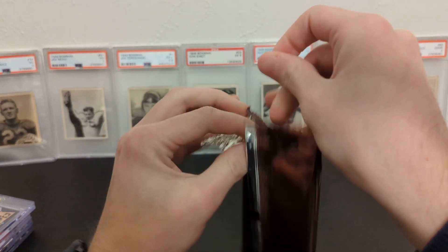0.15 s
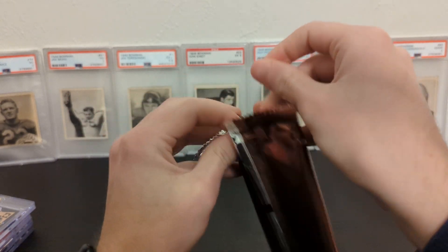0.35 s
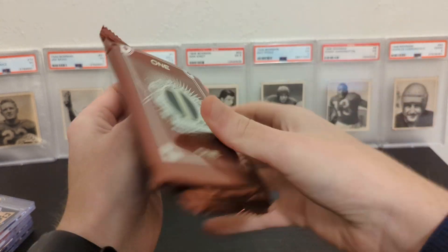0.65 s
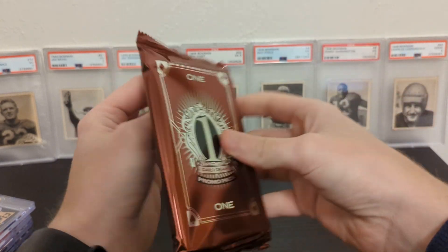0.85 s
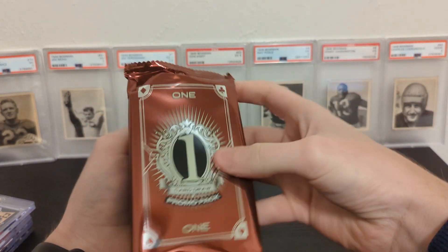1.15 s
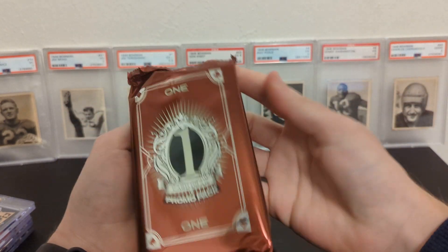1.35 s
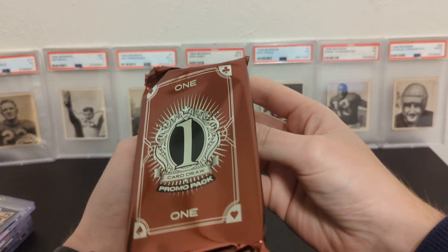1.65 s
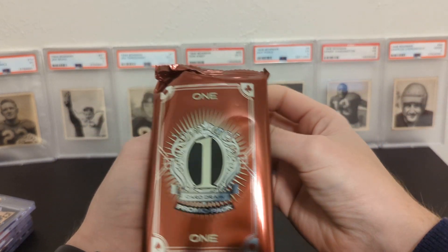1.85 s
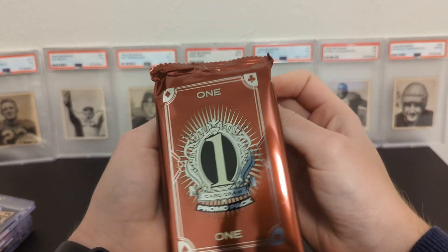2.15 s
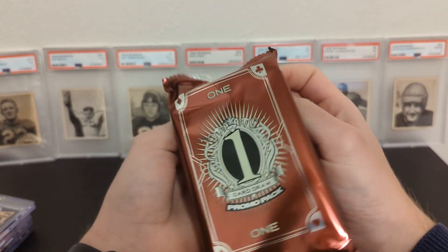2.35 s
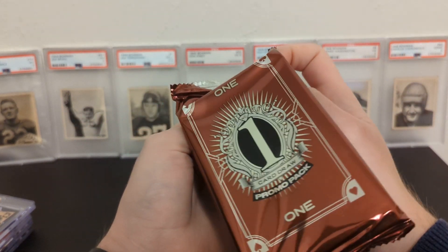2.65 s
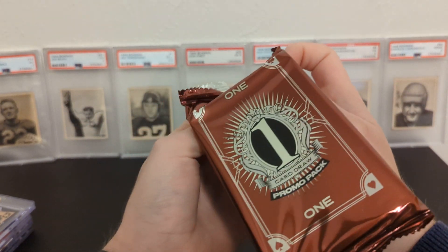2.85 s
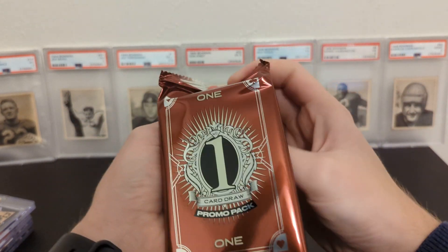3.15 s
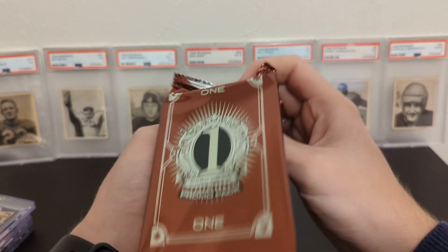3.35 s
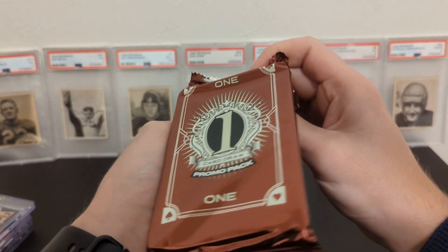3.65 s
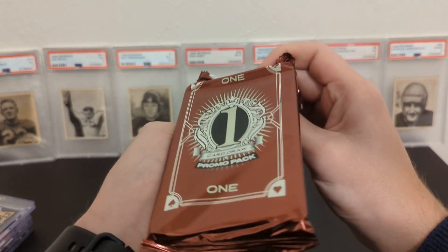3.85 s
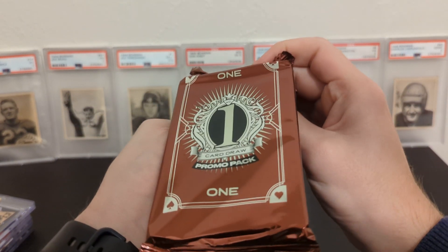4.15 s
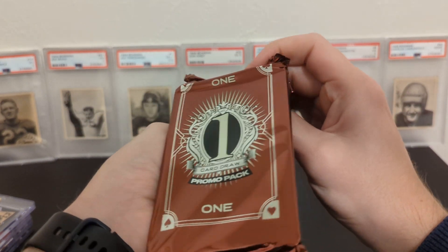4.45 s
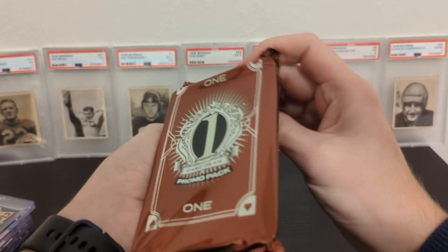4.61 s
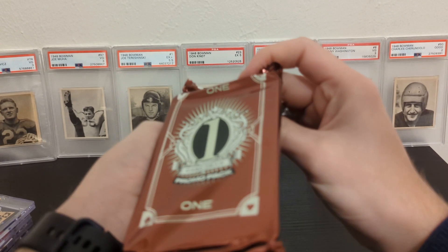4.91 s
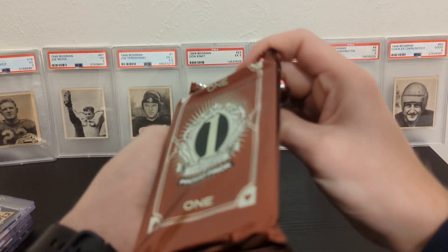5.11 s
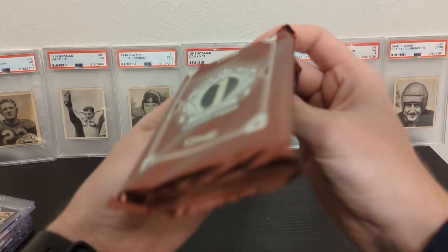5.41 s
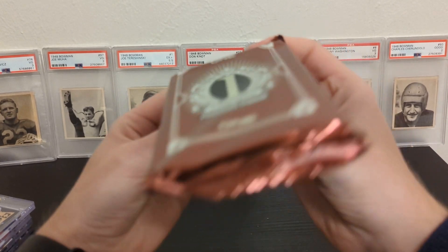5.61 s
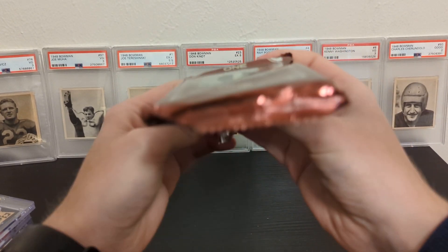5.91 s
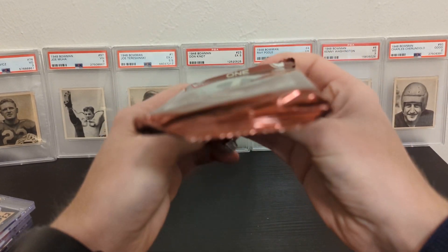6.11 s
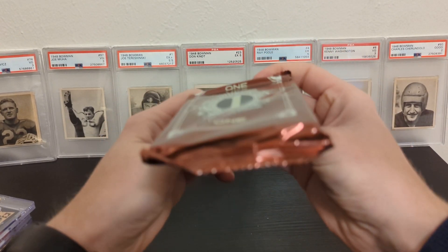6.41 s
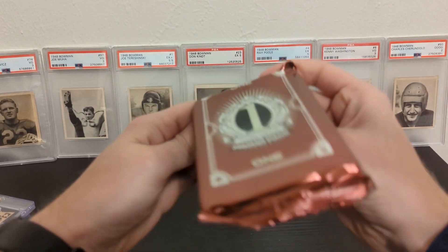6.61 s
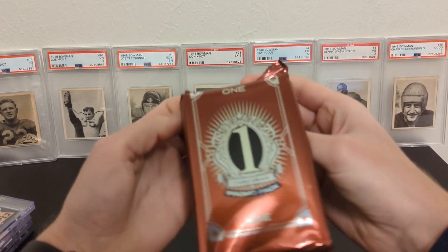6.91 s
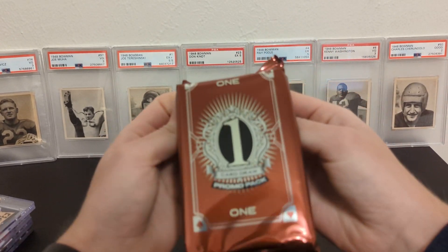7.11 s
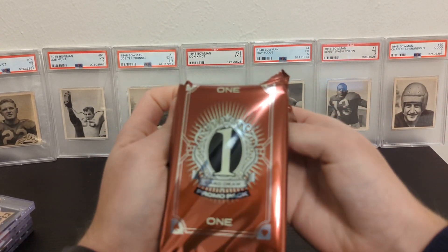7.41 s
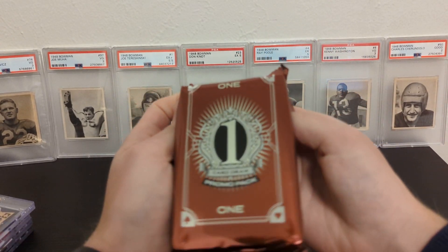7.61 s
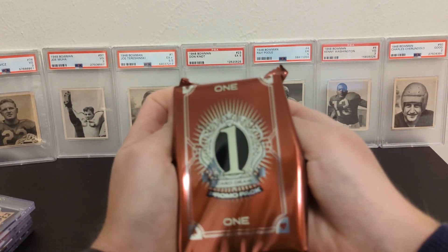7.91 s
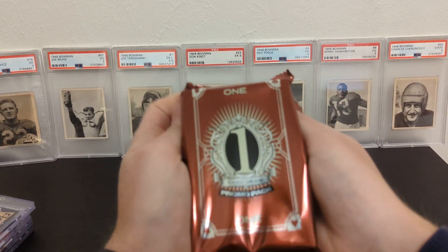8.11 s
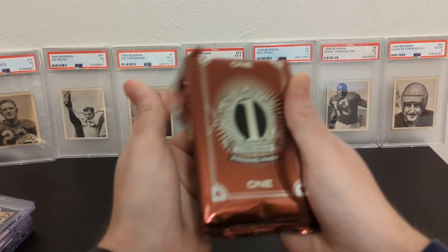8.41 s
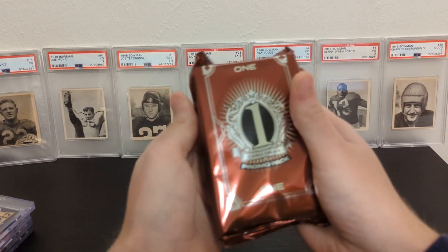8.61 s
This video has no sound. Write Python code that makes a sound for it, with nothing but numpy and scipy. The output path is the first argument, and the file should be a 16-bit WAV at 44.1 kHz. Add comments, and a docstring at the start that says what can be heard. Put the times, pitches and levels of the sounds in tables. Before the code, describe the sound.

Thin metallic-plastic wrapper crinkling, close and dry with a very short room tail. It opens with a few sharp snaps, continues in small rustling squeezes, thickens around three seconds, quiets near four, then builds to a loud crunch and dense crackling towards the end. Occasional muffled thumps come from the packet and table, above faint hum and hiss.

```python
"""Foil pack squeezed in a small room

Two hands squeeze and turn a foil pack close to a pair of microphone ports in a small quiet room.
Creases snap one by one as shaped noise bursts, over fine crackle and dull rustle made of many tiny cracks.
The pack, its contents and the table thump now and then as decaying low modes.
A faint mains-like hum of steady sines lies underneath, with low rumble and hiss of filtered noise."""
import sys
import numpy as np
from scipy import signal
from scipy.fft import rfft, irfft, next_fast_len
from scipy.io import wavfile
from scipy.ndimage import uniform_filter1d

SR = 44100
rng = np.random.default_rng(int(sys.argv[2]) if len(sys.argv) > 2 else 0)


def persist_wave(psi):
    """Save psi, clipped to +-1, as 16-bit WAV."""
    counts = np.round(np.clip(psi, -1, 1) * 32767).astype(np.int16)
    wavfile.write(sys.argv[1], SR, np.atleast_2d(counts).T)


N = 386316

# Creases that buckle close to the ports. Each row: onset in seconds, peak in dB at the louder port
# (before the port balance), ringing band in Hz, low band in dB against the peak,
# treble in dB against the peak, length in ms.
CREASE_SNAPS = [(0.0498, -4.5, 5860, -28, -15.5, 2.3), (0.0812, -25, 8400, -32, -12, 1.9),
                (0.112, -9.5, 5900, -38, -8, 2.2), (0.1319, -9.5, 13900, -17, -12, 3.3),
                (0.412, -19, 5960, -60, -31, 2.1), (0.4692, -19.5, 13100, -8, -4, 3.4),
                (0.4798, -15, 7040, -33, -26, 1.6), (0.5666, -19, 14000, -26, -18, 2.3),
                (0.673, -17, 9000, -27, 7, 3), (0.7185, -22, 1560, -10, -13, 2.7),
                (0.7702, -10, 5040, -21, -13, 7.3), (0.887, -13.5, 2320, -16, -26, 5),
                (1.0291, -21.5, 10300, -25, 2, 2.7), (1.1902, -10.5, 5800, -21, -8.5, 7.6),
                (1.1967, -13.5, 11700, -30, -5.5, 4.7), (1.2925, -15.5, 8920, -36, -4, 4.9),
                (1.3545, -14, 8600, -27, -13, 5.3), (1.503, -16, 8600, -40, -19, 2.7),
                (1.5239, -23, 2080, -25, -14, 3.4), (1.6447, -21.5, 8600, -26, -18, 3),
                (1.7416, -17.5, 12200, -29, -3, 2.7), (1.8937, -15.5, 6380, -32, -12, 4.3),
                (2.03, -15, 6100, -22, -10, 3.6), (2.048, -14, 8650, -37, -18, 5.1),
                (2.357, -23, 2020, 0, -15, 3), (2.4551, -10.5, 7840, -15, -10, 3.9),
                (2.5003, -6, 13800, -28, -8, 3), (2.5262, -20, 6280, -31, -17, 3),
                (2.6023, -15.5, 10100, -34, -20, 2.6), (2.638, -9.5, 6500, -46, -12, 4.1),
                (2.8175, -19, 3750, -26, -15, 1.9), (2.8848, -14.5, 8550, -13, -9, 3.3),
                (2.9472, -11, 1540, -18, -2, 4), (3.05, -11, 7600, -18, -11, 4.4),
                (3.136, -11, 9960, -24, -21, 2.6), (3.154, -4.5, 6220, -46, -21, 2.3),
                (3.207, -20, 7740, -32, -13, 3), (3.245, -10.5, 5900, -24, -18, 2.6),
                (3.3389, -7, 7640, -12, -2, 4.1), (3.3484, -9.5, 1760, -22.5, -7, 1.5),
                (3.3823, -4.5, 6230, -15.5, -10, 3.4), (3.4331, -13.5, 3220, -34, -20, 3),
                (3.4595, -10, 12800, -49, -19, 3), (3.5229, -8.5, 10800, -39, -12, 3.5),
                (3.5424, -8, 3100, -19, -15, 1.5), (3.5534, -5, 3940, -19.5, -14, 3),
                (3.6428, -10.5, 6140, -26, -19, 3), (3.745, -10.5, 7160, -15.5, -2, 3),
                (3.8656, -15, 6050, -35, -23, 3.4), (3.8814, -24, 2060, -25, -21, 3.4),
                (3.9586, -9.5, 5650, -31, -30, 1.9), (4.0103, -14, 4300, -33, -22, 2.5),
                (4.128, -18.5, 10700, -23, -7.5, 2.7), (4.1574, -36, 1970, -22, -13, 3),
                (4.1769, -20, 6100, -57, -16, 3), (4.2198, -21.5, 10500, -26, -13, 2.6),
                (4.2438, -18, 1950, -33, -42, 2.2), (4.3152, -12.5, 8300, -30, -10, 2.6),
                (4.4528, -19, 7810, -42, -7, 1.9), (4.4886, -5.5, 6180, -27.5, -15.5, 4.4),
                (4.6099, -14, 1920, -23, -27, 3.3), (4.6633, -7, 2130, -20, -17, 2.4),
                (4.6724, -1, 2980, -35.5, -19, 2.6), (4.7955, -11.5, 7900, -27, -13, 1.9),
                (4.8593, -6, 6350, -29.5, -19.5, 2.1), (4.8936, -6.5, 13800, -29, -13.5, 3.3),
                (4.9468, -16.5, 2920, -31, -25, 3.4), (5.0604, -14, 13200, -56, -8, 2.4),
                (5.0734, -23, 1600, -21, -19, 2.1), (5.1334, -15, 8650, -21.5, -5.5, 3),
                (5.178, -24, 14000, -25, -17, 3), (5.25, -17.5, 2020, -27, -10, 5),
                (5.2613, -15, 7360, -28, -35, 3.9), (5.3677, -16.5, 8600, -35, -23, 1.1),
                (5.4325, -22.5, 3090, -24, -33, 1.9), (5.4596, -22, 2060, -19, -14, 3.6),
                (5.4784, -8, 13000, -26.5, -15, 4), (5.5637, -16, 2980, -28, -19.5, 5.3),
                (5.6208, -6, 12000, -29, -8, 3.7), (5.655, -10, 8100, -14.5, -3.5, 2.5),
                (5.681, -1.5, 6400, -22, -4, 5.1), (5.6928, -11.5, 6020, -22, -16, 2.1),
                (5.7763, -20.5, 9720, -4, -9, 3.7), (5.791, -19, 1870, -16, -10, 2.1),
                (5.8403, -14.5, 6400, -20.5, -21, 2.5), (5.8544, -18.5, 2090, -26, -27, 2.6),
                (5.9392, -24.5, 2140, -9, -6, 1.9), (6.0255, -18.5, 11900, -33, 3, 3),
                (6.0415, -15, 12000, -19, 0, 2.1), (6.0935, -15, 6270, -36, -14, 3),
                (6.1085, -22.5, 12000, -22, -21, 3), (6.1284, -17, 3070, -26, -34, 4),
                (6.1386, -14.5, 10800, -28, -16, 3.3), (6.2589, -6, 9600, -31, -13, 5.2),
                (6.3244, -15, 8970, -27, -7, 3), (6.336, -10.5, 6540, -25, -33, 3.4),
                (6.3622, -12, 8800, -36, -22, 3.2), (6.4196, -13, 8700, -45, -15, 3),
                (6.4388, -13.5, 7850, -49, -11, 4.2), (6.5845, 4, 6230, -24, -4, 3.2),
                (6.6224, -2, 1980, -22, -17, 2.4), (6.6314, -10, 2170, -25, -13, 3),
                (6.648, -5, 2800, -24, -38, 2), (6.7204, -13.5, 2210, -43, -40, 3),
                (6.769, -8.5, 7800, -33, -12, 2.5), (6.8088, -8, 3040, -25, 3, 2.5),
                (6.8945, -9.5, 2170, -17.5, 0.5, 3.8), (6.944, -16.5, 2890, -28, -25, 4.4),
                (6.9848, -18, 6220, -32, -15, 3), (7.0641, -11.5, 2850, -26, -24, 4.8),
                (7.0833, -14, 2610, -16.5, -16.5, 8.6), (7.1198, -10.5, 6340, -48, -23, 2.3),
                (7.2, -14, 12400, -21, -14, 2.4), (7.232, -10.5, 6300, -20, -16, 2.8),
                (7.275, -15, 3150, -30, -23, 3.6), (7.292, -1.5, 8830, -24.5, -16, 3.5),
                (7.3586, -0.5, 6570, -47, -28, 4.5), (7.3684, -1, 6540, -37, -28, 2.7),
                (7.382, -7, 2480, -26, -27, 7.4), (7.3971, 0.5, 2120, -31, -23, 3),
                (7.5915, -6, 8050, -21, 5, 4.9), (7.6899, -24, 12500, -31, -5, 3),
                (7.7117, -10.5, 12700, -25, -7, 3), (7.7333, -5.5, 12500, -14, -3, 3),
                (7.7745, -2, 10200, -19, -7.5, 4.2), (7.8002, -12, 12800, -34, -9, 3),
                (7.8044, -5.5, 12800, -13.5, -7, 3.7), (7.861, -2, 6950, -20, -2, 3.7),
                (7.894, 1, 13900, -19, -7, 3.6), (7.9773, -3, 10100, -36, 1, 2.6),
                (8.064, -8.5, 2090, -31, -17, 1.9), (8.0931, -8.5, 9220, -16, -10, 2.2),
                (8.2004, -2.5, 10100, -17, -9, 2.2), (8.272, -10.5, 10400, -12, -14, 4.8),
                (8.3694, -9.5, 2020, -7.5, -1, 1.6), (8.3984, -8, 2050, -19, -16, 4.1),
                (8.4532, -15, 2060, -21, -20, 2.6), (8.498, -12, 14100, -33, -18, 2.3),
                (8.5757, -10.5, 2140, -19, -16, 2.4), (8.609, -9.5, 7070, -28, 4, 3),
                (8.7445, -5, 6280, -27, -12, 3)]
USUAL_LOW_DB, USUAL_TREBLE_DB = -21.5, -17  # usual low-band and treble shares of a snap in dB against its peak; each snap's tilt is reckoned from these
BURST_PEAK_S = 0.01  # a burst peaks this long after its start


def gain_of(db):
    """Turns decibels into an amplitude factor."""
    return 10 ** (np.asarray(db) / 20)


def evened(x):
    """Scales a signal to rms 1."""
    return x / np.sqrt(np.mean(x ** 2) + 1e-20)


def read(points, hz):
    """Reads a curve of (Hz, value) points on a log-frequency axis."""
    f, value = np.transpose(points)
    return np.interp(np.log(hz + 1), np.log(f + 1), value)


def add(mix, s, sound):
    """Mixes a two-channel sound in at time s in seconds."""
    part = mix[:, max(round(s * SR), 0):][:, :sound.shape[1]]
    part += sound[:, :part.shape[1]]


def ports(pair, colour_db):
    """Colours two unrelated signals and blends them into two ports whose likeness depends on pitch."""
    # How alike the two microphone ports hear. Each row: frequency in Hz, left-right likeness from 0 to 1.
    port_likeness = [(60, 0.84), (130, 0.89), (290, 0.87), (640, 0.62), (1410, 0.44), (3100, 0.32),
                     (15000, 0.96)]
    left_lead, lead_spread = 2.73, 2.06  # samples: mean lead of the left port, and its random spread
    hz = np.fft.rfftfreq(pair.shape[-1], 1 / SR)
    same = np.clip(read(port_likeness, hz), 0, 1)
    a, b = rfft(pair)
    lead_s = (left_lead + lead_spread * rng.standard_normal()) / SR
    left = a * np.exp(2j * np.pi * hz * lead_s)
    right = same * a + np.sqrt(1 - same ** 2) * b
    return irfft(np.array([left, right]) * gain_of(colour_db(hz)), pair.shape[-1])


def slow(per_s):
    """Smooth chance: unit-variance random knots, per_s of them a second, joined by straight lines."""
    knots = rng.standard_normal(4000)
    return np.interp(np.arange(N) / SR * per_s, np.arange(len(knots)), knots)


def burst(rise_s, crack_s, ring_s, ring_db):
    """Two noise bursts: a quick rise to a sharp tick, a short crack, and a ring of the sheet after it."""
    t = np.arange(2048) / SR - BURST_PEAK_S
    rise = 1.13 * np.exp(-abs(t) / rise_s)
    fall = np.exp(-abs(t) / crack_s) + gain_of(ring_db) * np.exp(-abs(t) / ring_s)
    tick = 0.41 * np.exp(-abs(t) / 0.00026)
    shape = np.where(t < 0, rise, fall) + tick
    return rng.standard_normal((2, len(t))) * shape * signal.windows.tukey(len(t), 0.1)


def hum():
    """Steady hum sines, two close enough to beat, over filtered noise: low rumble and faint room hiss."""
    # The hum lines. Each row: frequency in Hz, level in dB rms before the port balance.
    hum_lines = [(59.06, -69), (119.96, -58.6), (123.4, -67.5)]
    # Spectrum of the quiet room. Each row: frequency in Hz, relative density in dB per Hz.
    rumble_shape = [(12, -46), (20, 28), (120, 44.5), (204, 32), (574, -14), (1030, -49), (1330, -56),
                    (2020, -48), (2750, -25), (6180, -6), (6910, -76), (12100, 20), (16000, 20)]
    rumble_db = -60.5  # rms before the port balance
    t = np.arange(N) / SR
    lines = 0
    for hz, db in hum_lines:
        lines = lines + np.sqrt(2) * gain_of(db) * np.sin(2 * np.pi * (hz * t + rng.random()))
    noise = rng.standard_normal((2, next_fast_len(N)))
    rumble = ports(noise, lambda hz: read(rumble_shape, hz))[:, :N]
    port_balance = gain_of([[0.4], [-0.4]])
    return (lines + gain_of(rumble_db) * evened(rumble)) * port_balance


def foil_db(hz):
    """The colour in dB that snaps and fine crackle share: a broad curve with the foil's resonances on top."""
    # Foil heard at the microphone. Each row: frequency in Hz, relative density in dB per Hz.
    foil_colour = [(240, -30), (400, -14), (700, -12), (1370, -5), (3000, -3), (5000, -3), (8000, 0),
                   (15300, 0), (16500, -4)]
    # Resonances on top of it. Each row: centre in Hz, width in Hz, height in dB.
    foil_resonances = [(2117, 195, 4.3), (4160, 81, 1.84), (6300, 740, 3.86), (8940, 82, 6),
                       (10100, 98, 1.5), (12400, 225, 2.7)]
    peaks = sum(db * np.exp(-((hz - peak_hz) / width) ** 2) for peak_hz, width, db in foil_resonances)
    return read(foil_colour, hz) + peaks


def working():
    """Gains of fine crackle and dull rustle, and the tilt: holding, squeezes and snap showers add in power."""
    # The pack merely held. Each row: time in seconds, crackle in dB, dull rustle in dB against the crackle.
    holding = [(0, -55, -4), (1.6, -53, -2), (2.8, -44, -19), (3.9, -44, -17.5), (4.44, -55, -20.5),
               (5.05, -51, -14), (6, -47.5, -22), (7.04, -62, -1), (7.6, -40.5, -10), (8.76, -42.5, 1)]
    # Squeezes of the pack. Each row: start in seconds, length in seconds, crackle in dB at the start,
    # crackle in dB at the end, dull rustle in dB against the crackle, tilt in dB per octave.
    squeezes = [(0, 0.22, -37, -41, -8.5, 3), (0.213, 0.038, -33.5, -25.5, -12, -9.5),
                (0.258, .14, -38, -44.5, -4.5, -8), (0.472, 0.044, -37, -39, -14, 0.5),
                (0.673, 0.056, -42, -39.5, -14, -2), (0.756, 0.081, -42.5, -38, -2.5, -2),
                (0.872, 0.22, -34.5, -49, -14, 0.5), (1.14, 0.12, -43, -41, -3, -0.5),
                (1.266, 0.14, -39.5, -41, -9, -0.5), (1.436, 0.12, -41, -39.5, -9.5, 0),
                (1.726, 0.087, -40.5, -44, -12.5, 1.5), (1.873, 0.29, -38.5, -35.5, -12, 1.5),
                (2.321, 0.21, -38.5, -34, -9, 2.5), (2.602, 0.21, -35.5, -30.5, -23, -3.5),
                (2.922, 0.16, -41.5, -35.5, -9.5, -1), (3.147, 0.1, -36, -37.5, -12.5, -4),
                (3.332, 0.14, -31.5, -40.5, -10, -1), (3.531, .26, -38.5, -42, -34, 6.5),
                (3.854, 0.052, -48.5, -49, -7.5, 23), (4.205, 0.084, -46.5, -50, -16, 10),
                (4.302, 0.1, -44.5, -44, -29, 6.5), (4.482, 0.1, -45.5, -36, -23, -3),
                (4.652, 0.2, -43.5, -41.5, -15.5, -6), (5.14, 0.075, -43.5, -47, -28, 0),
                (5.264, 0.065, -44, -52, -9, -4), (5.452, 0.3, -44, -38.5, -23, -1.5),
                (5.766, 0.18, -43, -41, -21, 5.5), (6.082, 0.033, -41, -34, -28, 6),
                (6.13, 0.15, -31, -32, -46, 10.5), (6.317, 0.25, -30, -46, -41, 6.5),
                (6.559, 0.037, -37, -26, -27, 8.5), (6.593, 0.099, -14.5, -33.5, -23.5, -4.5),
                (6.662, 0.32, -37, -40, -14.5, -4), (7.065, 0.34, -45, -33.5, -14.5, -3.5),
                (7.288, 0.055, -21, -13.5, -30, -0.5), (7.341, .12, -25, -22, -20.5, -3.5),
                (7.571, 0.051, -32.5, -28.5, -17, -3), (7.737, .12, -24.5, -32, -15, 3.5),
                (7.856, 0.11, -18.5, -21, -22, -2), (7.981, 0.13, -28, -30.5, -31, -3.5),
                (8.176, 0.32, -33, -36.5, -10, -3), (8.599, 0.068, -37, -30.5, -8, -3),
                (8.692, .08, -23.5, -30, -7.5, -3)]
    grip_db_per_s, ease_db_per_s = 900, 448  # how fast a squeeze sets in and lets go
    shower_db, shower_db_per_s = -26, 361  # crackle set off by a snap, against its peak; its decay
    shower_dull_db = -13.0  # dull rustle against that crackle, at the usual low share
    t = np.arange(0, N / SR + 0.01, 0.002)
    s, held_db, held_dull_db = np.transpose(holding)
    fine = gain_of(np.interp(t, s, held_db)) ** 2
    dull = fine * gain_of(np.interp(t, s, held_dull_db)) ** 2
    tilt = 0 * t
    for start, length, first_db, last_db, dull_db, tilt_db in squeezes:
        end = start + length
        off_db = grip_db_per_s * np.maximum(start - t, 0) + ease_db_per_s * np.maximum(t - end, 0)
        power = gain_of(np.interp(t, [start, end], [first_db, last_db]) - off_db) ** 2
        fine = fine + power
        dull = dull + power * gain_of(dull_db) ** 2
        tilt = tilt + power * tilt_db
    tilt = tilt / fine  # mean tilt, weighted by power
    for onset, peak_db, _, low_db, *_ in CREASE_SNAPS:
        power = (t >= onset) * gain_of(peak_db + shower_db - shower_db_per_s * abs(t - onset)) ** 2
        fine = fine + power
        dull = dull + power * gain_of(low_db - USUAL_LOW_DB + shower_dull_db) ** 2
    return [np.interp(np.arange(N) / SR, t, v) for v in (np.sqrt(fine), np.sqrt(dull), tilt)]


def grains(colour_db, lo_hz, hi_hz, per_s, spread_db, clump_db, length_s, count, tilt_db=0):
    """Clumped tiny cracks of many sizes, each kind favouring one band; the running rms is held at 1."""
    out, kind = np.zeros((2, N)), rng.integers(0, count, N)
    octaves_up = np.log2(hi_hz / lo_hz) * kind / (count - 1)
    size = gain_of(spread_db * np.minimum(rng.exponential(1, N), 4) + clump_db)
    size *= (rng.random(N) < per_s / SR) * gain_of(tilt_db * octaves_up)
    for k, ring_hz in enumerate(np.geomspace(lo_hz, hi_hz, count)):
        def tint(hz):
            return colour_db(hz) + 14.4 * np.exp(-(np.log((hz + 1) / ring_hz) / 0.8) ** 2)
        noise = burst(rise_s=0.69 * length_s, crack_s=length_s, ring_s=2.65 * length_s, ring_db=-7.5)
        grain = ports(noise, tint)
        train = size * (kind == k)
        cracks = signal.oaconvolve(train[None], grain, axes=1)
        out += cracks[:, round(BURST_PEAK_S * SR):][:, :N]
    return out / np.sqrt(abs(uniform_filter1d((out ** 2).mean(0), size=SR // 16)))


def crackle():
    """Fine crackle, separate small pops and dull rustle, all driven by the working of the hands."""
    # Colour of the dull rustle. Each row: frequency in Hz, relative density in dB per Hz.
    rustle_shape = [(88, -46), (150, -1.5), (173, -5), (326, 0), (475, -10.5), (616, -8.5), (661, -8.5),
                    (1060, -4), (2500, -0.5), (3250, -0.5), (5500, -120)]
    slide_db, slide_slope = -14, 0.52  # below this dull share the fingers slide: pops fade, dB per dB
    light_db, light_slope = -39.5, 0.18  # below this level the fine crackle thins out, dB per dB
    fine_gain, dull_gain, tilt_db = working()
    clumps = slow(110.0)
    fine = grains(foil_db, 2170, 13100, per_s=2200, spread_db=3.0, clump_db=1.2 * clumps,
                  length_s=0.0015, count=18, tilt_db=tilt_db)
    pops = grains(foil_db, 845, 12800, per_s=130, spread_db=2.0, clump_db=4.1 * clumps,
                  length_s=0.0013, count=18, tilt_db=tilt_db)
    dull = grains(lambda hz: read(rustle_shape, hz), 422, 1605, per_s=500, spread_db=3.5,
                  clump_db=3.1 * clumps, length_s=0.0021, count=12)
    thin_db = light_slope * np.minimum(20 * np.log10(fine_gain) - light_db, 0)
    pop_db = slide_slope * np.minimum(20 * np.log10(dull_gain / fine_gain) - slide_db, 0)
    bright = gain_of(thin_db - 0.5) * fine + gain_of(pop_db - 1.5) * pops
    return fine_gain * bright + dull_gain * dull


def snaps():
    """Each buckling crease: a burst with its own length, ringing band, low share and treble share."""
    snap_rise_s = 0.0012  # from onset to the peak of the burst
    band_db = 7  # how much a snap favours its ringing band
    out = np.zeros((2, N))
    for s, peak_db, ring_hz, low_db, high_db, length_ms in CREASE_SNAPS:
        # every crease frees another patch of foil, so its spectrum has its own bumps
        bumps = np.transpose([np.geomspace(700, 16000, num=20), 4.5 * rng.standard_normal(20)])
        low, high = low_db - USUAL_LOW_DB, high_db - USUAL_TREBLE_DB
        tilt = [(600, low), (1500, low + 5), (4500, 0), (11000, high - 6.0), (15500, high - 4)]

        def colour(hz):
            band = band_db * np.exp(-(np.log((hz + 1) / ring_hz) / 0.16) ** 2)
            return foil_db(hz) + read(tilt, hz) + read(bumps, hz) + band
        length_s = length_ms / 1000
        noise = burst(rise_s=0.2 * length_s, crack_s=0.66 * length_s, ring_s=0.008, ring_db=-20)
        crack = ports(noise, colour)
        add(out, s + snap_rise_s - BURST_PEAK_S, gain_of(peak_db) * crack / abs(crack).max())
    return out


def thumps():
    """Each knock rings low, slightly rough modes that take about a cycle to build up."""
    # The table top knocked through the hands. Each row: time in seconds, nominal peak in dB.
    table_knocks = [(4.249, -40), (6.594, -18.5), (7.3, -45), (7.609, -41), (7.868, -40), (7.905, -41),
                    (8.714, -33)]
    # What the table rings with. Each row: frequency in Hz, level in dB against the knock, t60 in seconds.
    table_modes = [(61.3, -16, 0.28), (130, 1, 0.19)]
    # Stiff contents ticking inside the wrapper. Each row: time in seconds, nominal peak in dB.
    content_ticks = [(3.38, -40.5), (3.55, -38), (4.61, -39)]
    # Modes of the contents. Each row: frequency in Hz, level in dB against the tick, t60 in seconds.
    content_modes = [(615, 0.5, 0.18), (678, -0.5, 0.1)]
    # Fingers patting the pack, which rings by how it is held.
    # Each row: time in seconds, nominal peak in dB, frequency in Hz.
    finger_pats = [(3.789, -42.5, 360), (4.24, -45, 340), (4.948, -35, 231), (5.683, -42, 343),
                   (6.586, -35, 330), (7.292, -34, 332), (7.402, -35, 404), (7.451, -36.5, 380),
                   (7.742, -34, 362), (7.779, -43, 380), (7.806, -30, 402), (7.9, -33, 397),
                   (8.378, -29, 322), (8.423, -29, 337), (8.444, -24, 365)]
    pat_t60_s, rough_db = 0.061, 2.5  # decay of a pat; how unevenly any knock dies
    out, t = np.zeros((2, N)), np.arange(SR // 4) / SR
    rings = [(*pat, pat_t60_s) for pat in finger_pats]
    for knocks, modes in ((table_knocks, table_modes), (content_ticks, content_modes)):
        for s, db in knocks:
            rings += [(s, db + mode_db, hz, t60) for hz, mode_db, t60 in modes]
    for s, peak_db, hz, t60 in rings:
        # chance smoothed over three cycles
        wobble = evened(uniform_filter1d(rng.standard_normal(len(t)), size=round(3 * SR / hz)))
        decay = gain_of(peak_db - 60 * t / t60 + rough_db * wobble)
        build_up = 1 - np.exp(-t * hz / 0.84)
        ring = decay * build_up * np.sin(2 * np.pi * hz * t)
        add(out, s, ring * gain_of([[0.6], [-0.6]]))
    return out


def room(x):
    """Small-room tail: sparse taps of random sign after a short gap, each band dying at its own speed."""
    # Decay of the room. Each row: frequency in Hz, t60 in seconds.
    room_decay = [(300, 0.12), (2000, 0.13), (6000, 0.094), (15000, 0.046)]
    taps = np.zeros((2, SR // 2))
    # one tap in every 20 samples, from sample 300 on
    at = np.arange(300, SR // 2 - 20, 20) + rng.integers(0, 20, (2, (SR // 2 - 301) // 20))
    np.put_along_axis(taps, at, rng.choice([-1.0, 1.0], at.shape), 1)
    hz, t, bands = signal.stft(taps, SR, nperseg=256)
    fade = gain_of(-60 * t / read(room_decay, hz)[:, None])
    tail = signal.istft(bands * fade, SR, nperseg=256)[1]
    tail = ports(tail, np.zeros_like)
    return signal.oaconvolve(x.mean(0)[None], tail / np.linalg.norm(tail[0]), axes=1)[:, :N]


def scene():
    """Snaps and crackle with their room, plus the dry thumps, over the hum."""
    port_balance = gain_of([[0.6], [-0.6]])
    foil = (snaps() + crackle()) * port_balance
    return foil + gain_of(-12.0) * room(foil) + thumps() + hum()


def record(dry):
    """The microphone's hard ceiling just under full scale, then a steep low-pass as band limit."""
    edge_hz = 15900
    edge = signal.firwin(511, edge_hz, window=("kaiser", 9), fs=SR)
    return signal.oaconvolve(np.clip(dry, -0.9, 0.9), edge[None], "same")


dry = scene()
out = record(dry)
persist_wave(out)
```